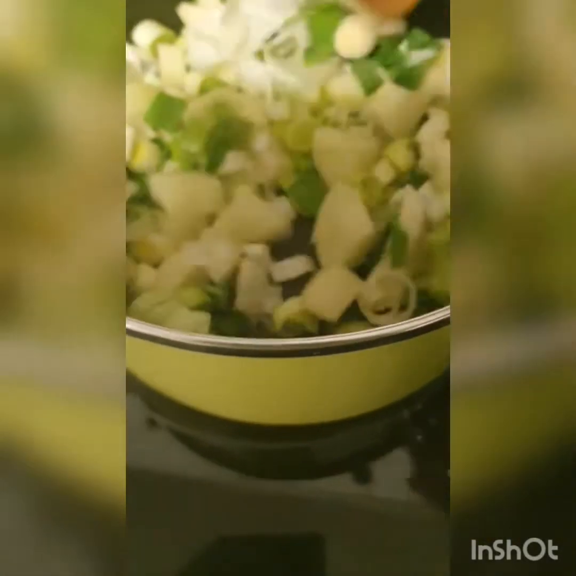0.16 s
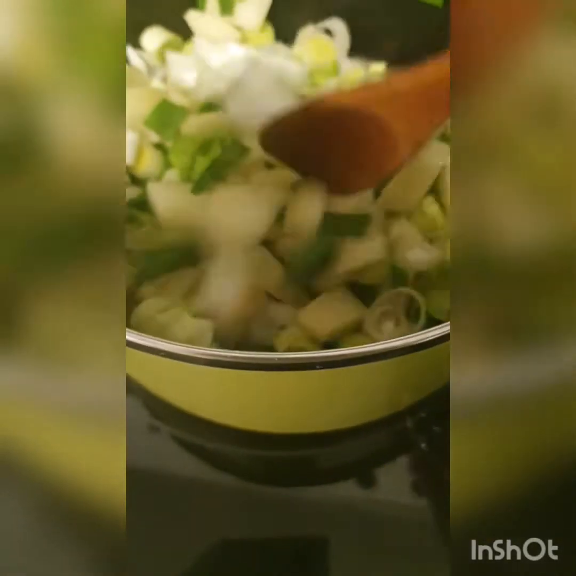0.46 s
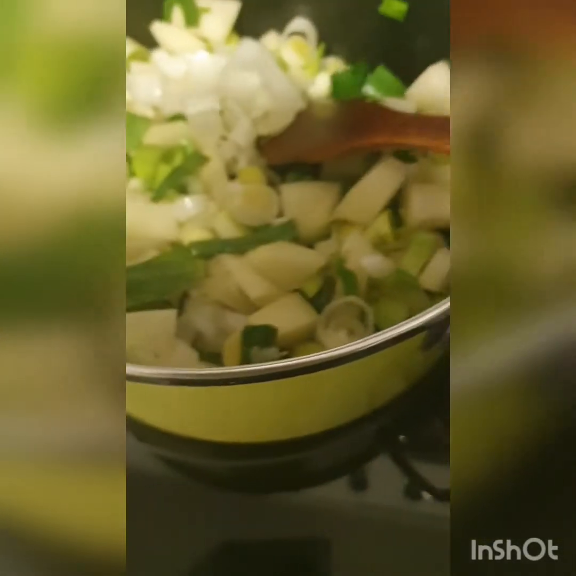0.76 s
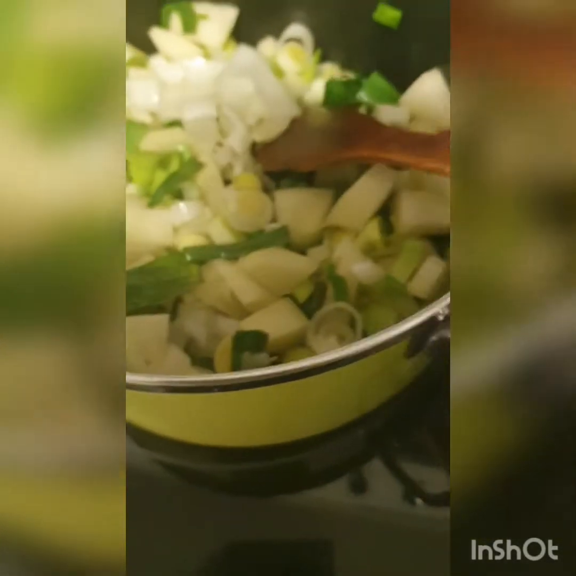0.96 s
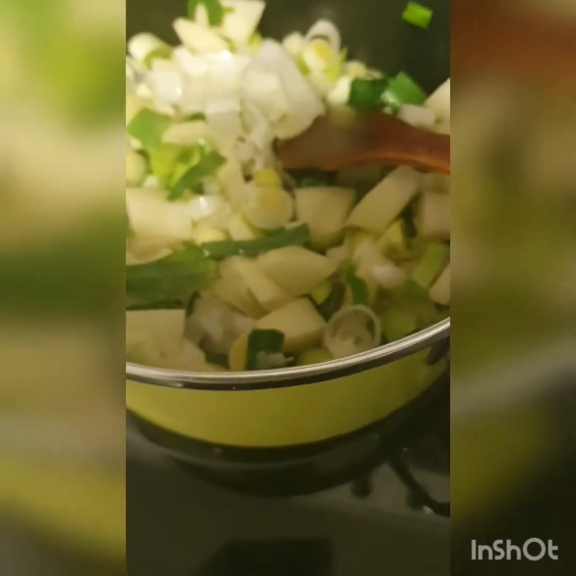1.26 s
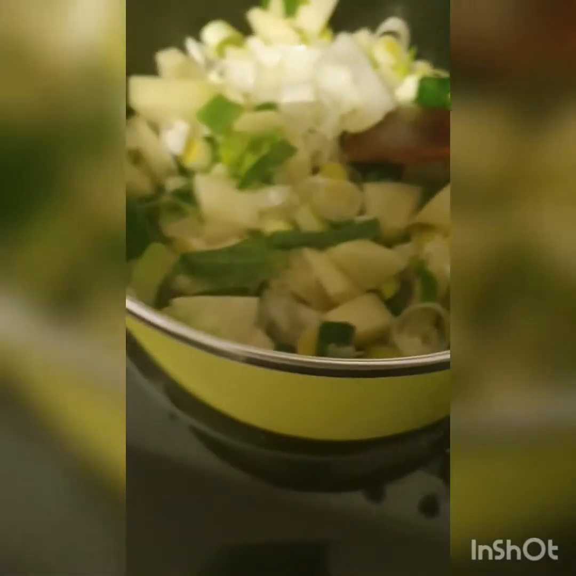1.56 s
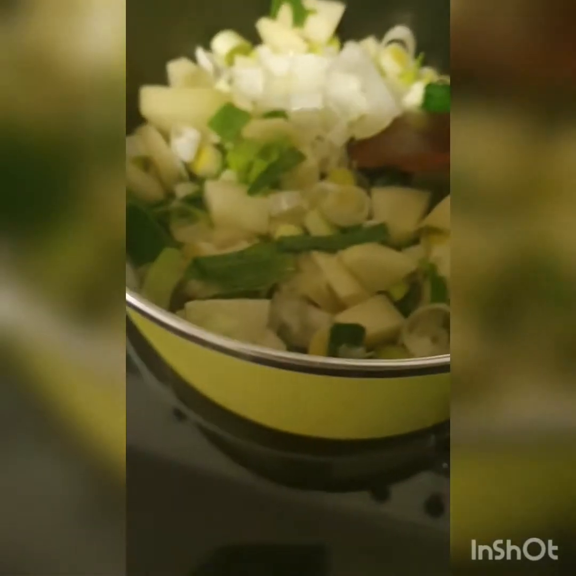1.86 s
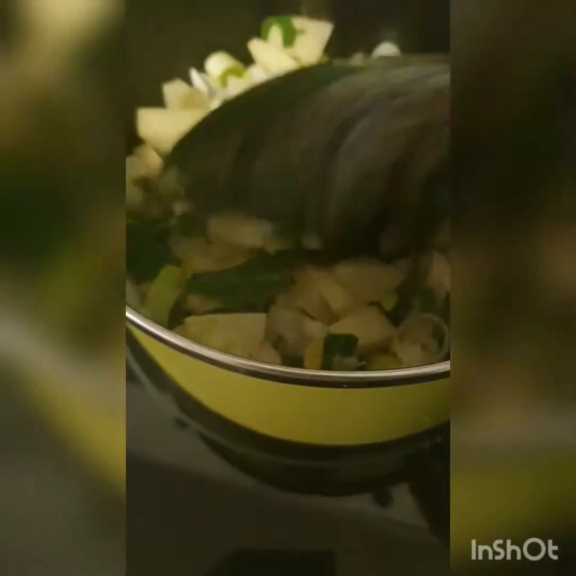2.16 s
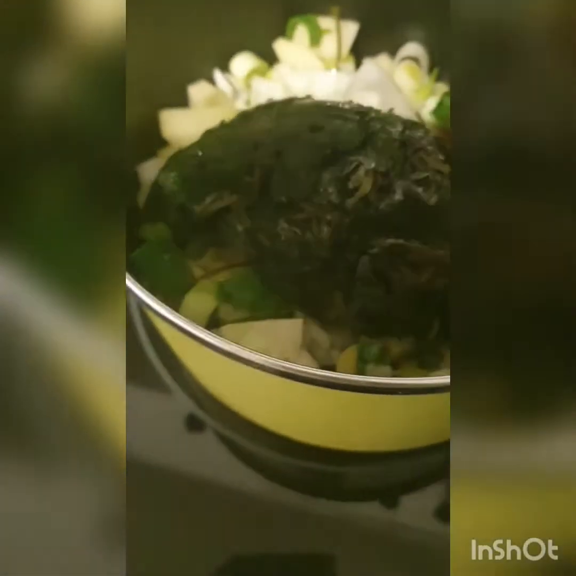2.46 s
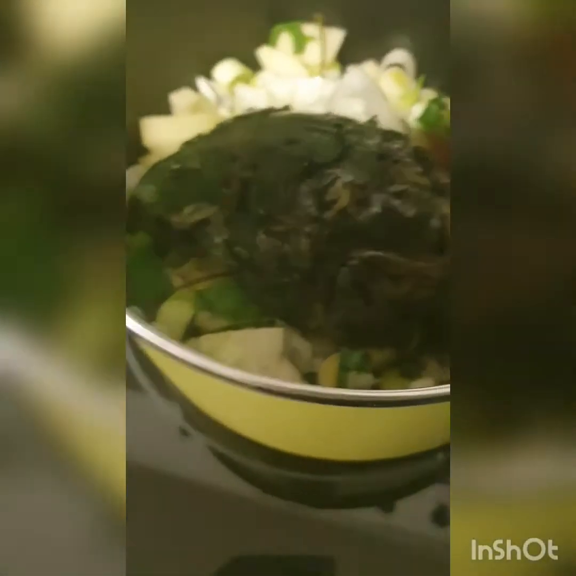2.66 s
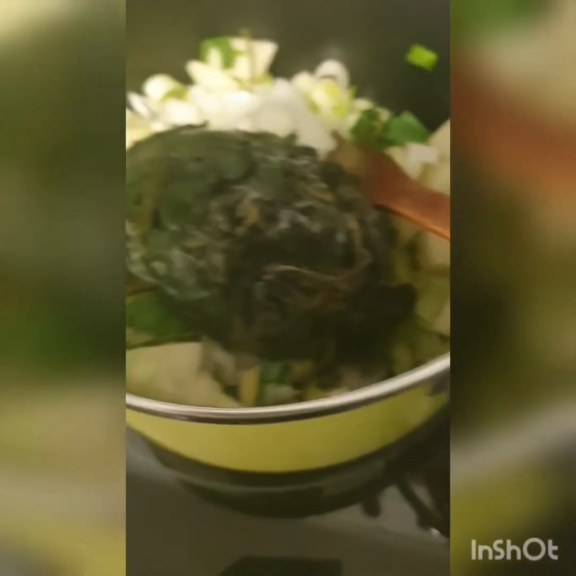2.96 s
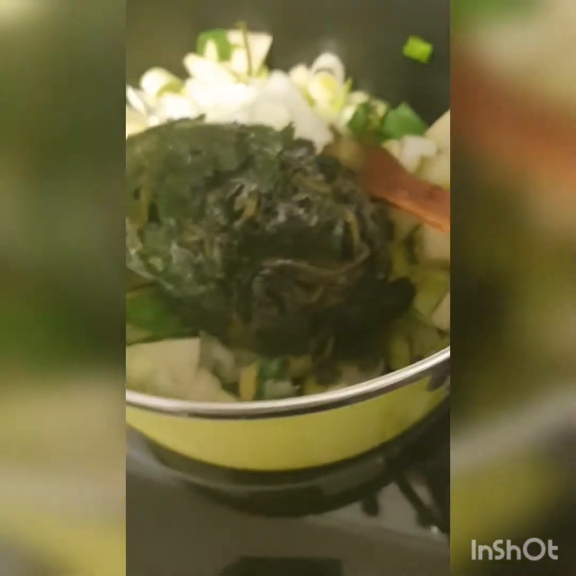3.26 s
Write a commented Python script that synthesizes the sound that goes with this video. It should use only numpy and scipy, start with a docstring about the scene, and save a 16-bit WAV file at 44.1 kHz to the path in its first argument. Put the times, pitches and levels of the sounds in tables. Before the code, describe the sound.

A wooden spoon knocks an enamel pot of chopped vegetables, then wet greens plop in with a squelch.

```python
"""An appliance hums over room air and rumble (shaped noise); food sizzles faintly until wet greens cover it.
A wooden spoon slides through chopped vegetables and knocks an enamel pot; a lump of greens squelches in.
Each contact is a noise burst of force, ringing the pot's modes and answered by a small kitchen.
Low bumps (damped sines) reach a hand-held phone close by; its left port is nearer the pot."""
import sys
import numpy as np
from scipy import signal
from scipy.fft import rfft, irfft, next_fast_len
from scipy.io import wavfile
from scipy.ndimage import uniform_filter1d

SR = 44100
rng = np.random.default_rng(int(sys.argv[2]) if len(sys.argv) > 2 else 0)


def int16_out(signal):
    """Quantize to a 16-bit WAV file."""
    q = np.round(np.clip(np.atleast_2d(signal).T, -1, 1) * 32767)
    wavfile.write(sys.argv[1], SR, q.astype(np.int16))


N = 149940
SPAN = 16384  # samples per contact or bump
SPAN_T_S, SPAN_HZ = np.arange(SPAN) / SR, np.fft.rfftfreq(SPAN, 1 / SR)


def amp(db):
    """Amplitude ratio of a level in dB."""
    return 10 ** (np.asarray(db) / 20)


def along(points, hz):
    """(f/Hz, value) points interpolated on a log axis."""
    f, v = np.transpose(points)
    return np.interp(np.log(hz + 1), np.log(f + 1), v)


def curve(rows):
    """(t/s, value) points as one value per sample."""
    return np.interp(np.arange(N) / SR, *np.transpose(rows))


def filtered(x, response):
    """x through a frequency response, padded against wrap-round."""
    m = next_fast_len(N + SR // 2)
    return irfft(rfft(x, m) * response(np.fft.rfftfreq(m, 1 / SR)), m)[..., :N]


# left-right likeness: f/Hz, likeness (0 to 1)
ALIKE = [(60, 0.89), (240, 0.97), (950, 0), (3770, 0), (15000, 0)]


def rush(gain):
    """Stereo noise whose mid has rms 1; left and right are alike in the bass."""
    def mid_side_gain(hz):
        turn = np.arccos(along(ALIKE, hz)) / 2
        return gain(hz) * [np.cos(turn), np.sin(turn)]

    mid, side = filtered(rng.standard_normal((2, N)), mid_side_gain)
    return np.array([mid + side, mid - side]) / np.sqrt(np.mean(mid ** 2) + 1e-20)


# hum lines: f/Hz, half-width at half gain/Hz, level/dB
HUM_LINES = [(215, 21, -69), (652, 2.4, -66.5), (306.4, 52, -64.5)]
# room air colour: f/Hz, relative density/dB per Hz
AIR_COLOUR, AIR_DB = [(76, -54), (130, 2.5), (224, -36), (274, -17), (395, 3), (428, -17.5), (545, 0.5),
                      (667, -3.5), (833, -10), (1690, -17), (2240, -21), (16200, -59.5)], -62.5
# rumble colour: f/Hz, relative density/dB per Hz
RUMBLE_COLOUR = [(20, -17), (32, -0.5), (53, 12.5), (118, 3), (160, -9), (210, -13), (300, -44)]
# rumble sway: t/s, level/dB
RUMBLE_SWAY = [(0, -54), (.62, -53), (.85, -62.5), (1.5, -59.5), (1.9, -60.5), (3.4, -60.5)]


def background():
    """Steady air, narrow noise bands as unsteady hum lines, and bass noise of swaying level."""
    hum = 0
    for line_hz, width_hz, db in HUM_LINES:
        hum = hum + amp(db) * rush(lambda hz: 1 / (1 + ((hz - line_hz) / width_hz) ** 2))
    air = amp(AIR_DB) * rush(lambda hz: amp(along(AIR_COLOUR, hz)))
    rumble = amp(curve(RUMBLE_SWAY)) * rush(lambda hz: amp(along(RUMBLE_COLOUR, hz)))
    return hum + air + rumble


# sizzle: t/s, level/dB
SIZZLE_LEVEL = [(0, -65), (.42, -63.5), (.65, -61), (.85, -68), (1.4, -69.5), (2.0, -74), (2.24, -61),
                (2.32, -79)]
# hiss colour: f/Hz, relative density/dB per Hz
FIZZ_COLOUR = [(880, -1.5), (1500, 3), (1940, -12.5), (2920, 3.5), (5050, 1), (10800, -5.5), (13700, -4),
               (16200, -7)]
SPIT_RATE_HZ, SPIT_END_S = 60, 2.2  # mean rate; until the greens cover the food
SPIT_DB, SPIT_SPREAD_DB = 11, 3.5  # relative to the hiss; spread of sizes
SPIT_MID_HZ, SPIT_CYCLES, SPIT_SAMPLES = 7000, 4, 256


def sizzle():
    """Fine hiss with sparse spits: swelling, decaying sines of random time, size, pitch and place."""
    draws = rng.random((round(SPIT_RATE_HZ * SPIT_END_S), 4))
    when, size, pitch, side = draws.T[:, :, None]
    sample = np.arange(SPIT_SAMPLES)
    cycles = SPIT_MID_HZ * 2 ** (2 * pitch - 1) * sample / SR  # an octave either way
    envelope = 2 * cycles * np.exp(-2 * np.e * cycles / SPIT_CYCLES)
    level = amp(SPIT_DB - SPIT_SPREAD_DB * np.log(size + 0.026))
    grains = level * np.sin(2 * np.pi * cycles) * envelope
    at = ((when * SPIT_END_S * SR).astype(int) + sample).ravel()
    shares = (1.5 - side, 0.5 + side)
    spits = np.array([np.bincount(at, (grains * share).ravel(), N)[:N] for share in shares])
    hiss = rush(lambda hz: amp(along(FIZZ_COLOUR, hz)))
    return amp(curve(SIZZLE_LEVEL)) * (hiss + spits)


def causal(db):
    """Minimum-phase response for a gain in dB, by folding the cepstrum."""
    cepstrum = irfft(db * np.log(10) / 20)
    cepstrum[..., 1:SPAN // 2] *= 2
    cepstrum[..., SPAN // 2 + 1:] = 0
    return np.exp(rfft(cepstrum))


EVEN_HZ = 300  # smoothing width


def force(shape):
    """Spectra of three shaped noise bursts, evened to a common energy across pitch."""
    burst = rfft(shape * rng.standard_normal((3, SPAN)))
    power = uniform_filter1d(abs(burst) ** 2, size=round(EVEN_HZ * SPAN / SR), axis=1)
    return burst * causal(10 * np.log10(0.02 * SR / power))


# pot modes: f/Hz, mean level/dB, t60/s
POT_MODES = [(296.7, -41.5, .22), (367.4, -36.5, 0.13), (586, -39, 0.14), (815, -47.5, 0.36),
             (1101, -48, 0.3), (1220, -45.5, 0.48), (1313, -35, 0.088), (1885, -49, 0.16),
             (3660, -34.5, 0.05), (4080, -36.5, 0.11), (4165, -35.5, .095), (4516, -48.5, .14)]
MODE_SPREAD_DB, BLUR_HZ = 3.6, 12  # the food blurs each mode
DENSE_HZ, DENSE_T60_S = 1720, 0.27  # many close modes of hob and pot base, up to this pitch


def pot(ring_db, dense_db):
    """Direct force plus clear modes of wandering phase and a dense low-passed noise decay."""
    f, level, t60 = np.transpose(POT_MODES)[:, :, None]
    steps = rng.standard_normal((len(POT_MODES), SPAN))
    drift = np.sqrt(2 * np.pi * BLUR_HZ / SR) * np.cumsum(steps, axis=1)
    level = ring_db + level + rng.normal(0, MODE_SPREAD_DB, f.shape)
    ring = amp(level - 60 * SPAN_T_S / t60) * np.sin(2 * np.pi * f * SPAN_T_S + drift)
    dense = rfft(amp(dense_db - 60 * SPAN_T_S / DENSE_T60_S) * rng.standard_normal(SPAN))
    ratio = SPAN_HZ / DENSE_HZ
    dense /= (1 + 0.8j * ratio - ratio ** 2) ** 3
    return 1 + dense + rfft(ring.sum(0))


# bands: centre f/Hz; the first and last extend the five given levels
BAND_HZ = [190, 400, 1050, 2300, 5200, 11500, 16000]
# widths of those bands: width/Hz
BAND_WIDTH_HZ = [120, 500, 900, 1700, 4700, 8000, 8000]
BASS_FALL_DB, TOP_FALL_DB = 24, 8  # below the low mids; above the top
BRIGHT_DB, BRIGHT_WIDTH_OCT = 8.5, 0.075


def band_colour(bands_db, bright_hz):
    """Minimum-phase colour from band levels, with an optional narrow boost."""
    levels = np.r_[bands_db[0] - BASS_FALL_DB, bands_db, bands_db[-1] - TOP_FALL_DB]
    density = levels - 10 * np.log10(np.array(BAND_WIDTH_HZ) / (SR / 2))
    colour_db = along(np.c_[BAND_HZ, density], SPAN_HZ)
    if bright_hz:
        octaves = np.log2((SPAN_HZ + 1) / bright_hz)
        colour_db += BRIGHT_DB * np.exp(-0.5 * (octaves / BRIGHT_WIDTH_OCT) ** 2)
    return causal(colour_db)


# kitchen decay: f/Hz, t60/s
KITCHEN = [(200, 0.33), (1500, 0.2215), (4000, 0.22), (10000, 0.21)]
WALL_S = 0.004  # tail delay


def kitchen_tail():
    """Fresh noise per port, decaying at a rate set by pitch; left has energy 1 before the delay."""
    noise = rng.standard_normal((2, SPAN * 3 // 4))
    hz, t, z = signal.stft(noise, SR, nperseg=256)
    decay = amp(-60 * t / along(KITCHEN, hz)[:, None])
    x = signal.istft(z * decay, SR, nperseg=256)[1]
    delayed = np.pad(x, ((0, 0), (round(WALL_S * SR), 0)))
    return rfft(delayed / np.linalg.norm(x[0]), SPAN)


ROOM_DB, PORTS_DB = -5, -0.5  # kitchen tail; what differs between ports
LEAD_HZ, SIDED_HZ = 342, 1190  # the lead fades below; the sides differ above


def add_contact(out, s, bands_db, shape, ring_db, dense_db, pan_db, lead_s, bright_hz=None):
    """A burst of force rings the pot, takes its bands' colour and reaches both ports and the walls."""
    hz = SPAN_HZ
    burst = force(shape)
    colour = band_colour(bands_db, bright_hz) * pot(ring_db, dense_db)
    alike = along(ALIKE, hz)
    sided = amp(pan_db / 2 * hz ** 2 / (hz ** 2 + SIDED_HZ ** 2) * [[1], [-1]])
    lag = np.exp(-2j * np.pi * hz ** 3 / (hz ** 2 + LEAD_HZ ** 2) * [[0], [lead_s]])
    near = (burst[0] + amp(PORTS_DB) * (1 - alike) * burst[1:]) * lag * sided
    left, right = kitchen_tail()
    right = right * np.sqrt(1 - alike ** 2) + left * alike
    walls = amp(ROOM_DB) * burst[0] * np.array([left, right])
    out[:, round(s * SR):][:, :SPAN] += irfft(colour * (near + walls), SPAN)


CREST_DB = 27.5  # nominal peak over band level

# spoon slides: t/s, mids nominal peak/dB, low mids level/dB, treble level/dB, length/s
SLIDES = [(0.004, -34, -52, -69.5, 0.022), (0.126, -38.5, -45, -84, 0.034), (1.366, -37, -53, -76, 0.014),
          (3.047, -29.5, -44, -66, 0.0078), (3.063, -22, -67, -57.5, 0.014),
          (3.11, -37.5, -47.5, -71, 0.0099), (3.168, -38, -38, -79, 0.026), (3.186, -33, -82, -60.5, 0.034),
          (3.196, -27, -78, -67.5, 0.008), (3.269, -36.5, -40.5, -95, 0.06),
          (3.304, -29, -79, -64.5, 0.031), (3.381, -40, -38.5, -79, 0.0091)]
SLIDE_RISE, SLIDE_MIN_S = 0.37, 0.014  # rise as a share of length; shortest length
SLIDE_TOP_DB, SLIDE_RING_DB, SLIDE_DENSE_DB = -16, -11.5, -32  # top is relative to treble


def slides():
    """Soft slides through the food: force swells and fades."""
    out = np.zeros((2, N + SPAN))
    for s, mid, low, high, length_s in SLIDES:
        u = SPAN_T_S / (SLIDE_RISE * max(length_s, SLIDE_MIN_S))
        mid -= CREST_DB
        bands = [low, mid - 3, mid, high, high + SLIDE_TOP_DB]
        add_contact(out, s, bands, u ** 2 * np.exp(-2 * u), SLIDE_RING_DB, SLIDE_DENSE_DB, -2, 0)
    return out[:, :N]


# low bumps: t/s, level/dB, f/Hz, t60/s
BUMPS = [(0.009, -31, 44.3, 0.1), (0.601, -19, 69.6, 0.086), (0.683, -28, 578, 0.12),
         (2.003, -28.5, 304, 0.038), (2.137, -14.5, 67.4, 0.15), (2.17, -9.5, 55.7, 0.098),
         (2.217, -17, 54.3, 0.11), (2.259, -32.5, 57.6, 0.21), (2.918, -36.5, 106, 0.42),
         (2.138, -3.5, 493, 0.02), (2.15, -18.5, 362.3, 0.15), (3.057, -31.5, 290, 0.092),
         (3.184, -33, 285.4, 0.17), (3.297, -30, 399.4, 0.085)]
BUMP_LEFT_DB = 1.5  # left over right


def bumps():
    """Low damped sines with a soft onset, the same wave in both ports."""
    out, t = np.zeros(N + SPAN), SPAN_T_S
    for s, db, hz, t60_s in BUMPS:
        onset = 1 - np.exp(-t * hz / 0.66)
        bump = amp(db - 60 * t / t60_s) * np.sin(2 * np.pi * hz * t) * onset
        out[round(s * SR):][:SPAN] += bump
    return out[:N] * amp([[BUMP_LEFT_DB / 2], [-BUMP_LEFT_DB / 2]])


# knocks and wet squelches (squelches near 2.00, 2.05 and 2.17 s):
# t/s, mids nominal peak/dB, low mids level/dB, upper mids level/dB, treble level/dB, top level/dB,
# brightest f/Hz, rise/ms, t60/s, clear ring level/dB, dense ring level/dB, treble left over right/dB
KNOCKS_AND_SQUELCHES = [(0.212, -14.5, -43.5, -43, -42.5, -64, 3940, 0.078, 0.023, -4, -65, 6),
                        (0.604, -15.5, -37, -46, -45.5, -54.5, 1970, 0.35, 0.024, -5.5, -44, 9),
                        (0.682, -7.5, -34.5, -43, -51, -122, 2510, 0.13, 0.021, -31, -50, 14),
                        (1.148, -44.5, -45, -60, -65.5, -84, 1930, 0.63, 0.013, -4, -31, 5),
                        (1.187, -32.5, -51, -61.5, -64, -81, 1890, 0.48, 0.055, -5, -37.5, -19),
                        (1.197, -22.5, -43, -57, -58, -71, 1980, 0.4, 0.022, -15, -57, 9),
                        (1.588, -31, -48.5, -60.5, -53, -74, 4960, 0.35, 0.018, -19, -32.5, 4),
                        (1.998, -28, -51.5, -47.5, -47, -66.5, 2900, 9.2, 0.021, -12, -42, 12),
                        (2.047, -25, -53, -36.5, -58.5, -49.5, 2150, 1.8, 0.028, -11, -49, 14.5),
                        (2.052, -38.5, -45.5, -54, -48, -49.5, 2260, 3.2, 0.024, -10, -44, 10.5),
                        (2.083, -30, -43.5, -48, -46, -67, 3070, 0.11, 0.0097, -14, -33, 20),
                        (2.087, -16.5, -46, -47, -49.5, -63, 1526, 0.8, 0.015, -39, -54.5, 18.5),
                        (2.138, -7.5, -26, -37.5, -46, -51.5, 3820, 0.82, 0.049, -30, -48.5, 7),
                        (2.151, -18, -26.5, -42, -48, -59, 2500, 5.7, 0.025, -20.5, -48, 0),
                        (2.167, -23.5, -29.5, -39, -56.5, -65.5, 2950, 1.4, 0.01, -23, -45, 12),
                        (2.172, -33, -40, -37, -56.5, -55, 2560, 0.94, 0.0095, -23, -56, 17),
                        (2.191, -35.5, -38.5, -53, -57, -54.5, 3500, 0.24, 0.02, -20, -56, 16),
                        (2.258, -14, -32.5, -33.5, -36.5, -54, 4080, 0.4, 0.031, -30, -48.5, 16.5),
                        (2.917, 4.5, -22, -28.5, -35, -43, 2770, 0.83, 0.016, -8, -33, 2.5)]
LEAD_S = 0.0004537  # left port's lead


def knocks_and_squelches():
    """Knocks and wet squelches: spoon and greens against pot and food; force rises and decays."""
    out = np.zeros((2, N + SPAN))
    for (s, mid, low, upper, high, top, hz, rise_ms, t60_s,
         ring_db, dense_db, pan_db) in KNOCKS_AND_SQUELCHES:
        rise = (1 - np.exp(-1000 * SPAN_T_S / rise_ms)) ** 2
        shape = rise * amp(-60 * SPAN_T_S / t60_s)
        bands = [low, mid - CREST_DB, upper, high, top]
        add_contact(out, s, bands, shape, ring_db, dense_db, pan_db, LEAD_S, bright_hz=hz)
    return out[:, :N]


# food spits and ticks: t/s, treble nominal peak/dB, top level/dB
TICKS = [(0.3656, -36.5, -64), (0.4325, -52, -66), (1.2183, -40, -67), (1.2505, -36, -94),
         (1.295, -29.5, -68.5), (1.4809, -34.5, -75), (1.5027, -41.5, -77), (1.984, -36.5, -72.5),
         (2.2298, -44, -63), (2.7007, -45.5, -85)]
TICK_T60_S, FAINT_DB = 0.018, -74  # force decay; level of an idle band


def ticks():
    """Brief treble bursts from the food, with no rise time and little ring."""
    out = np.zeros((2, N + SPAN))
    for s, high, top in TICKS:
        high -= CREST_DB
        bands = [FAINT_DB, FAINT_DB, high - 6, high, top]
        add_contact(out, s, bands, amp(-60 * SPAN_T_S / TICK_T60_S), -30, -50, 2, 0)
    return out[:, :N]


def scene():
    """Sum of all layers."""
    return background() + sizzle() + slides() + bumps() + knocks_and_squelches() + ticks()


BASS_CUT_HZ, TOP_HZ = 36, 15750


def record(dry):
    """The phone rolls off the deep bass (two poles) and cuts steeply above its band limit."""
    thin = filtered(dry, lambda hz: (1j * hz / (BASS_CUT_HZ + 1j * hz)) ** 2)
    return filtered(thin, lambda hz: 1 / (1 + (hz / TOP_HZ) ** 200))


dry = scene()
out = record(dry)
int16_out(out)
```